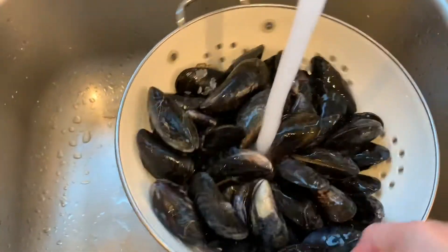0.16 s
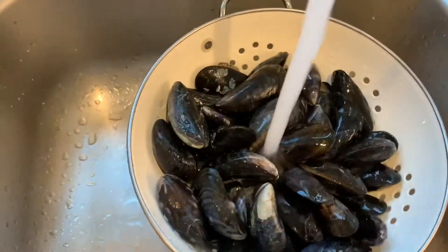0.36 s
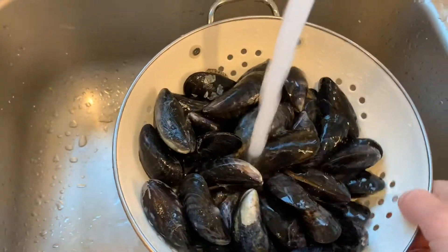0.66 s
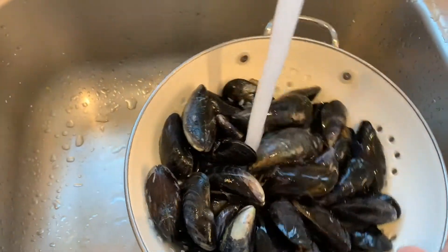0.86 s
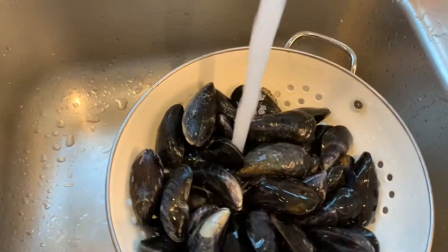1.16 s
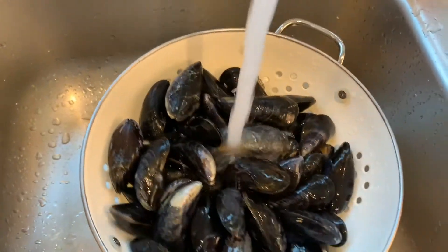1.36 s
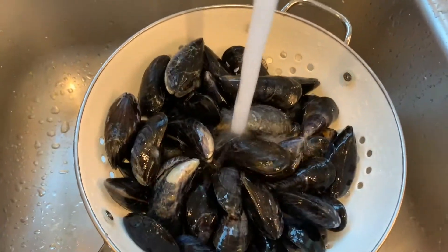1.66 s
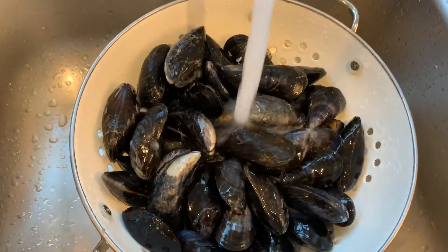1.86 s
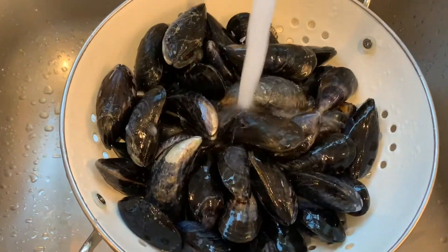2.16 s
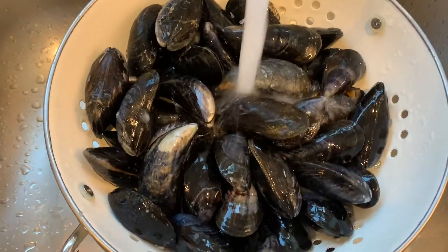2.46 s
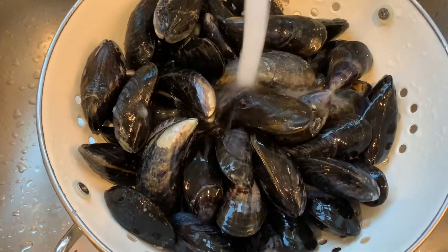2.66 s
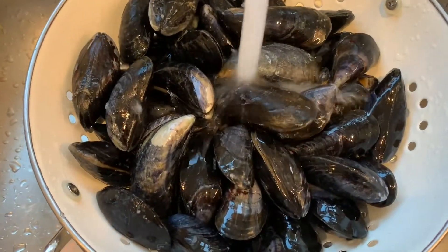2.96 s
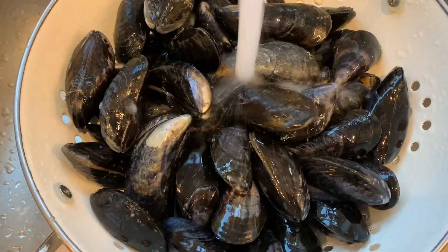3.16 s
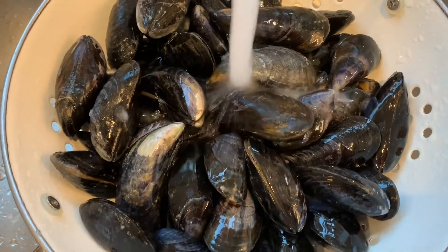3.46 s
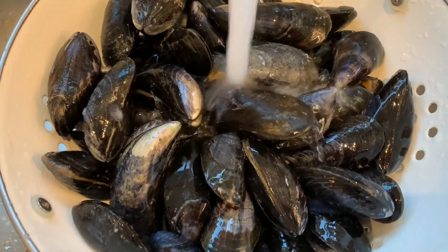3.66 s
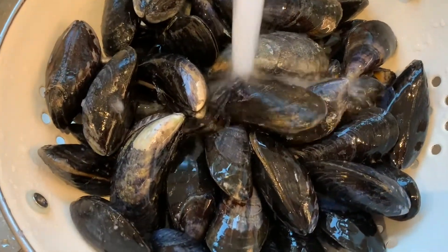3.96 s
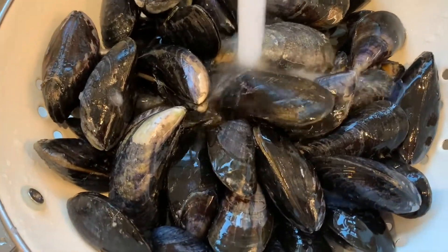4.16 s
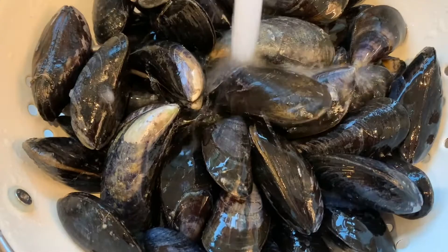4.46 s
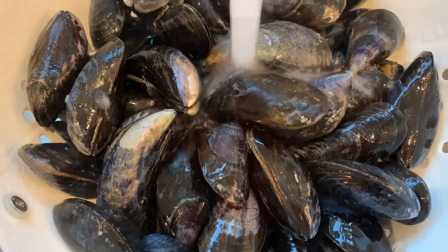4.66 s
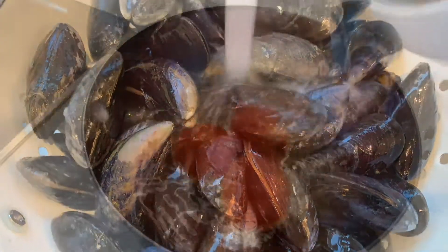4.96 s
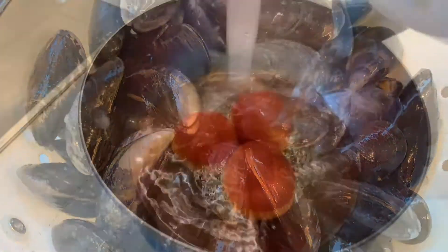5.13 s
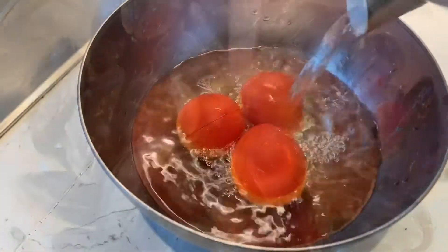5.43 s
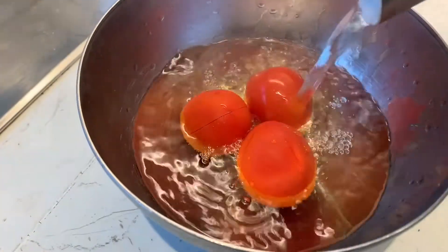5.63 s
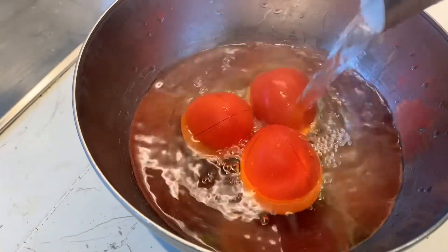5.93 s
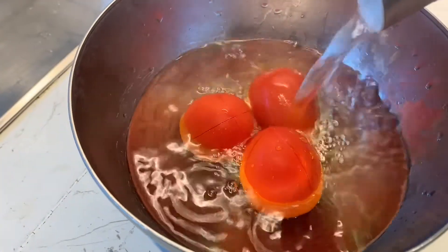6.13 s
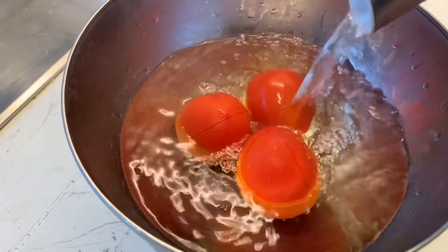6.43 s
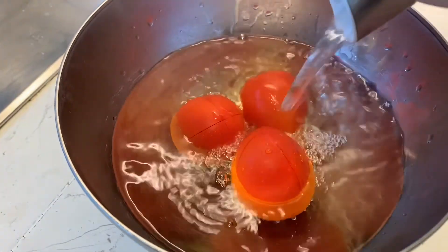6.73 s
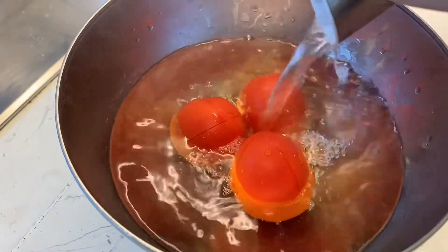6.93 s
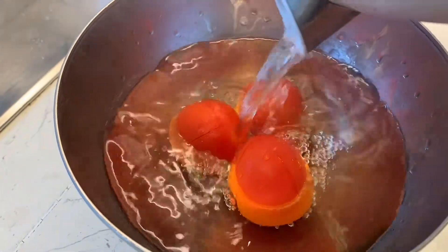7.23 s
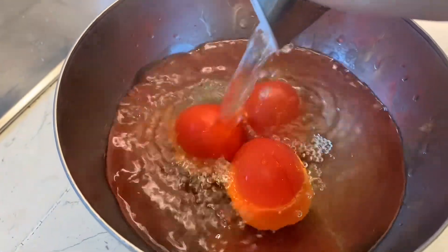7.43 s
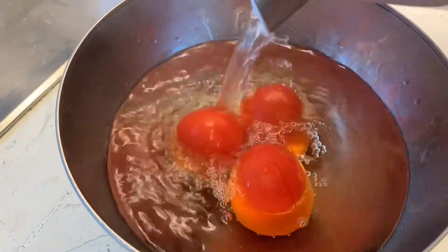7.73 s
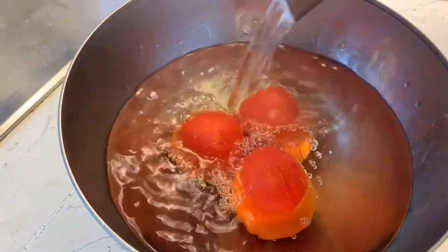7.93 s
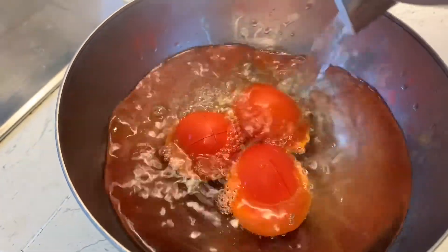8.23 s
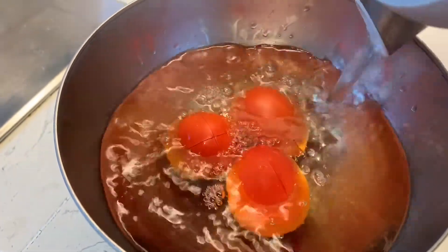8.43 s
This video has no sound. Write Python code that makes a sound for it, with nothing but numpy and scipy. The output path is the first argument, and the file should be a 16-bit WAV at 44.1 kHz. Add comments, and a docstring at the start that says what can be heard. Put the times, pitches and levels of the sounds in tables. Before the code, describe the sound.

A kitchen tap runs hard onto shellfish from the start, heard close: a bright, hissing spray with water trickling through a colander and a soft drumming on the steel sink. In the first 0.3 seconds the colander scrapes and knocks several times, making the basin boom; lighter bumps follow from 0.7 to 1.3 seconds. The spray dips briefly around 1 second, then gradually grows louder. Between 4.5 and 5.5 seconds it fades into a quieter, uneven stream poured from a jug over fruit in a steel bowl. This water fizzes and gurgles, with many small, hollow plops and crisp drops spattering over a low hum that swells with the bigger plops. The splashing is strongest around 7.5 seconds, a cluster of plops follows near 8 seconds, and the pouring continues until the end at about 8.6 seconds. A faint room rumble lies underneath throughout.

```python
"""Rinsing shellfish, pouring over fruit

A kitchen tap runs hard onto shellfish in a colander that a hand drags and bumps over a steel sink:
the jet breaks into broadband spray, and impacts and friction excite the basin's modes. The tap fades
into a jug of water poured unevenly over fruit in a steel bowl, where trapped air plops and drops
spatter over a low hum. A phone's two microphone ports hear the treble one after the other."""
import sys
import numpy as np
from scipy import signal
from scipy.fft import rfft, irfft, next_fast_len
from scipy.io import wavfile
from scipy.ndimage import uniform_filter1d, map_coordinates

SR = 44100
rng = np.random.default_rng(int(sys.argv[2]) if len(sys.argv) > 2 else 0)


def wrap_up_sound(samples):
    """Save the sound to the file named by the first command line argument, as 16-bit audio."""
    columns = np.atleast_2d(samples).T
    # keep every value between -1 and 1, then stretch to whole-number steps
    tamed = np.clip(columns, -1, 1)
    steps = np.round(tamed * 32767).astype(np.int16)
    wavfile.write(sys.argv[1], SR, steps)


N = 378819

# strength of the tap's three sounds: time_s, spray_db, runoff_db, drum_db
TAP_LEVELS = [(0, -27.5, -39, -39), (.6, -25.5, -35.5, -44.5), (.75, -31.5, -35, -41),
              (1.1, -31.5, -33.5, -44.5), (1.2, -25.5, -35.5, -42.5), (1.8, -25.5, -35, -43),
              (2.1, -23.5, -34, -42.5), (2.85, -22.5, -33.5, -41.5), (3.3, -22.5, -34.5, -41.5),
              (3.75, -22, -35.5, -41.5), (4.55, -21, -35.5, -41.5)]
# spectrum of the jet breaking on the shells: frequency_hz, gain_db
SPRAY_SPECTRUM = [(1500, -25.5), (2800, -24), (3250, -11), (3440, -24), (3750, -2), (4080, 1), (4400, -3.5),
                  (4800, 1), (5300, 0), (6300, -2.5), (7400, 1), (8300, 1.5), (10500, 0), (12600, -1),
                  (14000, 1), (15700, -3)]
# spectrum of water draining through the holes: frequency_hz, gain_db
RUNOFF_SPECTRUM = [(300, -8), (500, -24), (640, -11.5), (800, -5.5), (1050, -4.5), (1500, -3), (2100, -2.5),
                   (3000, 2.5), (4500, -0.5), (8000, -11.5)]
# modes of the steel basin: pitch_hz, bandwidth_hz, gain_db
BASIN_MODES = [(126.5, 15, -13.5), (217.6, 6.4, 1.5), (309.5, 17.5, -7.5), (432, 30, -17.5),
               (575, 54, -25.5), (895, 49, -63)]
# hollows among the shells: pitch_hz, bandwidth_hz, gain_db, growth_db_per_s
SHELL_HOLLOWS = [(780, 68, -7.5, 3), (931, 90, -10, 2), (1057, 43, 1.5, -0.7), (1250, 99, -4, 0.2),
                 (1810, 410, -3.5, -0.3), (2169, 59, 4, 0.5), (3100, 74, -3, 0.5), (3280, 200, 0.5, -0.4),
                 (4060, 260, 6.5, -0.3)]
# the colander sliding over the steel: time_s, rasp_db, boom_db
DRAG_LEVELS = [(0.0, -27, -52), (0.026, -24.5, -47), (0.054, -26.5, -43), (0.064, -33, -34),
               (0.116, -28.5, -24), (0.182, -40, -45), (0.225, -33, -30.5), (0.29, -43.5, -36.5),
               (0.37, -53, -56), (0.6, -54, -66), (0.74, -44, -60), (0.88, -57, -49), (1.0, -65, -44),
               (1.1, -58, -55), (1.27, -41.5, -60), (1.4, -77, -80)]
# modes of the colander: pitch_hz, bandwidth_hz, gain_db
COLANDER_MODES = [(437, 76, 0), (970, 95, -6.5), (1300, 530, -6), (1830, 3700, -11.5)]
# the colander's foot knocking the basin: start_s, push_db
KNOCKS = [(0.045, -16), (0.069, -7), (0.101, -6), (0.144, -8), (0.216, -7.5), (0.258, -13.5), (0.292, -25),
          (0.69, -17.5), (0.729, -12), (0.796, -20), (0.979, -19), (1.121, -22), (1.257, -24)]
# spectrum of the kitchen's rumble: frequency_hz, gain_db
RUMBLE_SPECTRUM = [(25, -42), (38, -5), (60, -1.5), (95, 0), (200, -26), (320, -5.5), (700, -24.5),
                   (1000, -20), (2000, -73)]
# strength of the pour's three sounds: time_s, fizz_db, splash_db, gurgle_db
POUR_LEVELS = [(5.55, -48, -55.5, -56.5), (5.81, -54.5, -60, -59.5), (6.02, -51.5, -64, -63.5),
               (6.19, -46.5, -58, -56), (6.46, -48, -60, -54.5), (6.74, -52.5, -57.5, -59),
               (7.04, -50.5, -67, -62), (7.24, -50, -57, -58.5), (7.4, -41.5, -55, -51.5),
               (7.48, -41, -48, -51), (7.64, -49, -59.5, -57.5), (7.92, -50.5, -67, -58),
               (8.13, -52.5, -74, -55.5), (8.29, -54.5, -68, -53.5), (8.42, -47.5, -57, -60.5),
               (8.59, -51, -59, -49.5)]
# spectrum of the poured stream's fizz: frequency_hz, gain_db
FIZZ_SPECTRUM = [(1500, -4), (2500, -3.5), (4000, 1.5), (6000, 6), (8500, 2), (10500, 2.5), (12500, 4),
                 (15500, 3.5)]
# modes of the air over the water in the bowl: pitch_hz, bandwidth_hz, gain_db
BOWL_MODES = [(570, 32, -2.5), (1110, 38, 4), (1540, 123, 2.5), (2524, 220, -10), (3110, 124, -5),
              (3770, 125, -10)]
# resonances of the low hum: pitch_hz, bandwidth_hz, gain_db
HUM_MODES = [(45, 3.6, -3), (90.2, 10, 6.5), (129, 28, -1), (153.6, 53.5, -5.5)]
# the biggest air pockets that the stream traps: start_s, level_db, pitch_hz
AIR_POCKETS = [(5.164, -37, 1180), (5.182, -33, 1570), (5.202, -39, 1100), (5.22, -36, 1530),
               (5.248, -30.5, 1580), (5.461, -41, 1520), (5.526, -35, 1140), (5.616, -33.5, 1150),
               (5.638, -32.5, 1540), (5.682, -39, 1530), (5.756, -35, 980), (5.777, -34.5, 1110),
               (5.872, -34, 1180), (5.985, -40, 1540), (6.002, -33, 1390), (6.015, -34, 1300),
               (6.043, -35, 1150), (6.075, -40, 1530), (6.132, -40, 1130), (6.163, -34.5, 1210),
               (6.184, -43, 1340), (6.198, -35, 1570), (6.204, -35, 1510), (6.22, -42, 1430),
               (6.251, -32.5, 1340), (6.279, -27, 1260), (6.294, -37, 1480), (6.303, -32, 1250),
               (6.306, -38, 1080), (6.324, -40, 900), (6.342, -36, 900), (6.381, -34.5, 1460),
               (6.45, -47, 1220), (6.468, -40, 1220), (6.512, -51, 1510), (6.528, -32, 1180),
               (6.542, -41, 1500), (6.564, -33, 1480), (6.584, -34, 1200), (6.656, -32, 1250),
               (6.891, -41, 1240), (6.999, -30, 1180), (7.02, -37, 1550), (7.053, -41, 1160),
               (7.096, -40, 1100), (7.149, -40, 1100), (7.199, -33.5, 1410), (7.231, -40, 1140),
               (7.259, -36, 1170), (7.3, -43, 1580), (7.314, -33, 1120), (7.329, -32, 1930),
               (7.347, -34, 1050), (7.367, -34, 1080), (7.379, -37, 1100), (7.398, -40, 934),
               (7.414, -43, 1760), (7.417, -23, 1780), (7.4188, -38, 1750), (7.457, -38, 1810),
               (7.505, -36, 1670), (7.52, -30, 1200), (7.548, -34, 1220), (7.561, -34, 1100),
               (7.576, -30.5, 1540), (7.629, -41, 1100), (7.659, -39, 1190), (7.671, -29.5, 1390),
               (7.806, -44, 1400), (7.843, -32, 1190), (7.926, -50, 1140), (7.938, -31.5, 1300),
               (7.939, -36, 579), (7.982, -30.5, 1420), (8.02, -25, 1250), (8.022, -34.5, 570),
               (8.041, -28.5, 1250), (8.073, -30, 1440), (8.08, -25, 1370), (8.107, -38, 1150),
               (8.178, -37, 1340), (8.195, -34, 1550), (8.215, -28, 1210), (8.243, -28, 1300),
               (8.26, -39, 1500), (8.285, -41, 1480), (8.296, -34, 1560), (8.359, -39, 1170),
               (8.371, -35, 1580), (8.404, -53, 1350), (8.423, -32.5, 1500), (8.471, -45, 1520),
               (8.493, -29, 1530), (8.505, -32, 1130), (8.527, -39, 853), (8.542, -36, 1350),
               (8.556, -37, 1520), (8.576, -35, 1110)]
# the biggest drops that burst on the fruit: start_s, snap_db, ring_db
BIG_DROPS = [(5.533, -21, -49), (5.617, -24, -48), (5.669, -35, -35), (5.728, -16.5, -43),
             (5.737, -30, -34), (5.745, -22, -46), (5.782, -23, -40), (5.9025, -26, -51),
             (5.9575, -35, -42), (5.972, -31, -52), (5.9868, -16.5, -29), (6.005, -28, -38),
             (6.01, -22, -39), (6.017, -28, -38), (6.043, -34, -50), (6.056, -35, -52), (6.076, -32, -50),
             (6.091, -31, -53), (6.104, -20, -52), (6.1254, -28, -52), (6.134, -14, -40), (6.159, -20, -46),
             (6.162, -18, -37), (6.184, -29, -50), (6.198, -29, -48), (6.2033, -24, -47),
             (6.2206, -17, -51), (6.248, -18.5, -35), (6.324, -24, -44), (6.3595, -19, -52),
             (6.371, -24, -52), (6.4674, -16, -32), (6.4784, -21, -36), (6.5123, -29, -40),
             (6.542, -24, -35), (6.5832, -16, -48), (6.6006, -22, -47), (6.626, -34, -36),
             (6.644, -17, -32.5), (6.6712, -23, -52), (6.775, -23, -46), (6.94, -24, -39),
             (7.032, -16, -46), (7.1202, -28, -58), (7.149, -19, -53), (7.155, -25, -56), (7.232, -18, -35),
             (7.24, -19, -33), (7.273, -24, -52), (7.282, -34, -44), (7.305, -24, -45), (7.3197, -25, -33),
             (7.332, -18.5, -29), (7.347, -26, -28), (7.365, -35, -38), (7.379, -33, -40),
             (7.3931, -27, -46), (7.41, -26, -46), (7.417, -26, -46), (7.431, -28, -46), (7.456, -28, -35),
             (7.4674, -21, -22.5), (7.5, -25, -36), (7.5083, -18, -42), (7.511, -26, -36),
             (7.527, -18, -30), (7.5382, -10.5, -36), (7.5484, -30, -34), (7.56, -33, -40),
             (7.5772, -29, -48), (7.628, -30, -46), (7.641, -20, -47), (7.6694, -15, -34),
             (7.719, -24, -58), (7.7428, -37, -55), (7.7797, -24, -56), (7.809, -23, -45),
             (7.8497, -23, -43), (7.876, -22, -56), (7.8989, -27, -59), (7.9258, -33, -56),
             (7.9286, -24, -56), (7.931, -8.5, -51), (7.9386, -25, -40), (7.949, -11, -41),
             (7.96, -24, -48), (7.964, -22, -51), (7.974, -22, -42), (7.9822, -13, -51), (7.9845, -24, -50),
             (7.989, -23, -52), (7.997, -17, -54), (8.0127, -22, -42), (8.021, -17, -46), (8.071, -38, -42),
             (8.079, -18, -38), (8.146, -35, -60), (8.195, -38, -57), (8.2166, -27, -57), (8.244, -23, -53),
             (8.247, -22.5, -55), (8.2528, -26, -49), (8.256, -29, -55), (8.285, -30, -51),
             (8.295, -26, -40), (8.3325, -25, -54), (8.35, -28, -50), (8.355, -22, -41), (8.359, -20, -50),
             (8.372, -26, -31), (8.406, -30, -38), (8.409, -18, -50), (8.423, -32, -43), (8.4337, -34, -53),
             (8.4447, -21, -39), (8.4542, -23, -46), (8.4706, -28, -37), (8.486, -23, -53),
             (8.49, -27, -27), (8.498, -21.5, -48), (8.528, -24, -52)]
# likeness of the sound at the two ports: frequency_hz, coherence
PORT_COHERENCE = [(140, .9995), (250, .99), (400, .92), (650, .88), (1300, .93), (2700, .7), (3600, .78),
                  (4300, .9997), (16000, .9997)]
# level of the left port over the right: frequency_hz, difference_db
PORT_BALANCE = [(300, 0), (800, -3), (2200, -2.5), (3500, 0)]
# phase by which the left side leads the right, lingering near half a turn around each treble null:
# frequency_hz, lead_rad
PORT_PHASE = [(0, 0), (700, -.4), (1300, 0), (2700, 1.8), (3300, 1.5), (4050, 2), (4400, 3), (5100, 3.3),
              (5500, 4.4), (8200, 8.3), (8500, 9.25), (9400, 9.6), (9700, 10.6), (12400, 14.5),
              (12700, 15.5), (13600, 15.9), (13900, 16.8), (17430, 22)]

SINK_FADE_OUT_S, BOWL_FADE_IN_S = (4.46, 5.545), (4.6, 5.23)  # each: start_s, end_s
TIME_S = np.arange(N) / SR


def amp(db):
    """Amplitude ratio of a level in decibels."""
    return 10 ** (np.asarray(db) / 20)


def unit(x):
    """Normalisation to an rms of 1."""
    return x / np.sqrt(np.mean(x ** 2) + 1e-20)


def along(points, hz):
    """Interpolation of (frequency_hz, value) points on a logarithmic frequency axis."""
    knots_hz, values = np.transpose(points)
    return np.interp(np.log(hz + 1), np.log(knots_hz + 1), values)


def curves(rows):
    """Linear envelopes, one for each column after the time, held beyond the ends."""
    times_s, *columns = np.transpose(rows)
    return [np.interp(TIME_S, times_s, column) for column in columns]


def ramp(span_s):
    """Linear fade from 0 to 1 over the span."""
    return np.interp(TIME_S, span_s, (0, 1))


def wobble(rate_hz):
    """Slow random modulation: a spline through rate_hz Gaussian knots a second."""
    return map_coordinates(rng.standard_normal(int(N * rate_hz / SR) + 4), [TIME_S * rate_hz])


def filtered(x, response):
    """Linear filtering: the spectrum of x times a complex frequency response."""
    size = next_fast_len(N + SR // 2)
    return irfft(rfft(x, size) * response(np.fft.rfftfreq(size, 1 / SR)), size)[..., :N]


def spectrum(table):
    """Zero-phase response through (frequency_hz, gain_db) points."""
    return lambda hz: amp(along(table, hz))


def modes(table):
    """Modal superposition: the response of damped resonators summed with alternating sign."""
    return lambda hz: sum((-1) ** k * amp(db) * 1j * hz * width / (pitch**2 - hz**2 + 1j * hz * width)
                          for k, (pitch, width, db) in enumerate(table))


def rush(response, patchy_db):
    """Coloured noise of rms 1, modulated in random patches of time and frequency."""
    cells = signal.stft(rng.standard_normal(N), nperseg=256)[2]
    patches = uniform_filter1d(rng.standard_normal(cells.shape), size=5, axis=0)
    patches = uniform_filter1d(patches, size=8, axis=1)
    noise = signal.istft(cells * amp(patchy_db * unit(patches)), nperseg=256)[1][:N]
    return unit(filtered(noise, response))


def superpose(start_s, waves):
    """Superposition of short waves, one a row, each at its own start time."""
    at = (start_s * SR).astype(int)[:, None] + np.arange(waves.shape[1])
    return np.bincount(at.ravel(), waves.ravel(), N)[:N]


def damped(start_s, db, hz, decay_cycles, rise, samples):
    """Damped oscillations that start softly and climb in pitch as they die."""
    cycles = np.arange(samples) / SR * hz[:, None]
    envelope = amp(db)[:, None] * np.exp(-cycles / decay_cycles) * (1 - np.exp(-cycles / 0.2))
    phase = 2 * np.pi * cycles * (1 + rise * cycles / decay_cycles)
    return superpose(start_s, envelope * np.sin(phase))


def grains(count, centre_hz, spread, decay_cycles, spiky_db, samples):
    """Shot noise of rms 1: droplets of log-normal pitch, a few much louder than the rest."""
    when, rank = rng.random((count, 2)).T
    hz = np.clip(centre_hz * np.exp(spread * rng.standard_normal(count)), 200, 16000)
    db = -spiky_db * np.log(rank + 1 / 200)
    return unit(damped(when * N / SR, db, hz, decay_cycles, rise=.05, samples=samples))


def sprinkle(count, flow_db, spread_db=3):
    """A random point process whose rate follows the flow: sample indices, size_db, a 0-1 draw each."""
    when, rank, draw = rng.random((count, 3)).T
    poured = np.cumsum(amp(flow_db) * ramp(BOWL_FADE_IN_S))
    return np.searchsorted(poured, when * poured[-1]), -spread_db * np.log(rank + .1), draw


def tap():
    """Impact noise: the aerated jet breaks on the shells, drains away and drums on the basin."""
    spray_db, runoff_db, drum_db = curves(TAP_LEVELS)
    spray_colour, runoff_colour = spectrum(SPRAY_SPECTRUM), spectrum(RUNOFF_SPECTRUM)
    shiver = wobble(rate_hz=45)
    droplets = grains(20000, centre_hz=13000, spread=0.25, decay_cycles=1.2, spiky_db=3.9, samples=64)
    spray = unit(rush(spray_colour, patchy_db=1.4) + 0.5 * unit(filtered(droplets, spray_colour)))
    trickle = grains(3000, centre_hz=2100, spread=0.5, decay_cycles=9, spiky_db=2, samples=600)
    trickle = unit(filtered(trickle, runoff_colour))
    hollows = shell_hollows()
    runoff = unit(rush(runoff_colour, patchy_db=1.5) + 0.28 * trickle + 0.8 * hollows)
    ring = rush(modes(BASIN_MODES), patchy_db=1.9)
    # the jet's steady push holds the basin's ring even over 0.35 s
    ring_power = np.abs(uniform_filter1d(ring ** 2, size=round(.35 * SR)))
    drum = amp(drum_db) * ring / np.sqrt(ring_power + 1e-9)
    return amp(spray_db + 0.89 * shiver) * spray + amp(runoff_db + 1.2 * shiver) * runoff + drum


def shell_hollows(swing_db=4, pivot_s=3):
    """Cavity resonance: water hisses in hollows among the shells, each filling and draining alone."""
    hiss = rush(np.ones_like, patchy_db=3)
    hollows = np.zeros(N)
    for k, (hz, width, db, growth) in enumerate(SHELL_HOLLOWS):
        swell = amp(growth * (TIME_S - pivot_s) + swing_db * wobble(rate_hz=7))
        hollows += (-1) ** k * swell * filtered(hiss, modes([(hz, width, db)]))
    return unit(hollows)


def colander():
    """Forced vibration: friction makes the colander rasp and the basin boom; knocks ring and thud."""
    # the weight resting on the steel shortens the ring
    loaded_basin = modes([(hz, width + 11, db + 5) for hz, width, db in BASIN_MODES])
    rasp_db, boom_db = curves(DRAG_LEVELS)
    rasp = amp(rasp_db) * rush(modes(COLANDER_MODES), patchy_db=3)
    boom = amp(boom_db) * rush(loaded_basin, patchy_db=2)
    force, t = np.zeros(N), np.arange(SR // 50) / SR
    soft_push = t / 0.0012 * np.exp(1 - t / 0.00095)
    for start_s, push_db in KNOCKS:
        force[round(start_s * SR):][:len(t)] -= amp(push_db) * soft_push
    thud = modes([(80, 90, -14)])
    return rasp + boom + filtered(force, lambda hz: loaded_basin(hz) + thud(hz))


def kitchen_rumble(level_db=-58):
    """Ambient noise: a steady floor with most of its energy at low frequencies."""
    return amp(level_db) * rush(spectrum(RUMBLE_SPECTRUM), patchy_db=1)


def pour():
    """Source and filter: the loose stream fizzes, and splashes and gurgles in the bowl's air modes."""
    fizz_db, splash_db, gurgle_db = curves(POUR_LEVELS)
    colour, low_modes, high_modes = spectrum(FIZZ_SPECTRUM), modes(BOWL_MODES[:3]), modes(BOWL_MODES[3:])
    lumps = amp(3.2 * wobble(rate_hz=45))  # the stream arrives unevenly
    crackle = grains(3500, centre_hz=7000, spread=0.7, decay_cycles=1, spiky_db=3.5, samples=128)
    fizz = unit(rush(colour, patchy_db=4) + unit(filtered(crackle, colour)))
    splash = unit(rush(high_modes, patchy_db=5) + 0.9 * unit(filtered(crackle, high_modes)))
    bubbles = grains(2200, centre_hz=1250, spread=0.67, decay_cycles=0.83, spiky_db=2.5, samples=500)
    bubbling = unit(filtered(bubbles + .8 * crackle, low_modes))
    gurgle = unit(rush(low_modes, patchy_db=3) + 1.6 * bubbling)
    return lumps * (amp(fizz_db) * fizz + amp(splash_db) * splash + amp(gurgle_db) * gurgle)


def hum(steady_db=-51, swell_db=-29.5, swell_s=0.02):
    """Driven resonance: the stream keeps a low hum going, which swells under each big plop."""
    swells = sum(amp(db + swell_db) * np.exp(-((TIME_S - start_s) / swell_s) ** 2)
                 for start_s, db, _ in AIR_POCKETS)
    return (amp(steady_db) + swells) * rush(modes(HUM_MODES), patchy_db=-2.5)


def plops(onset_s=.0001, slap_db=8, ring_db=-3.5, echo_s=.0053, echo_db=-10):
    """Bubble resonance: each air pocket slaps, then sings a few cycles; the bowl's air rings on."""
    gurgle_db = curves(POUR_LEVELS)[2]
    at, size_db, draw = sprinkle(count=260, flow_db=gurgle_db)
    small_pockets = np.transpose([at / SR, gurgle_db[at] + 6 + size_db, 900 + 800 * draw])
    start_s, db, pitch_hz = np.concatenate([small_pockets, AIR_POCKETS]).T
    start_s = start_s + onset_s
    cycles = np.arange(SR // 80) / SR * pitch_hz[:, None]
    peak_cycles = rng.uniform(.8, 1.5, (len(db), 1))
    pitch_sag = rng.uniform(-.01, .05, (len(db), 1))
    envelope = amp(db)[:, None] * (cycles / peak_cycles * np.exp(1 - cycles / peak_cycles)) ** 3
    notes = superpose(start_s, envelope * np.sin(2 * np.pi * cycles * (1 - pitch_sag * cycles)))
    slap_hz = np.full(len(db), 2500)
    slaps = damped(start_s, db + slap_db, slap_hz, decay_cycles=0.083, rise=0.011, samples=100)
    far_wall_echo = filtered(notes, lambda hz: amp(echo_db) * np.exp(-2j * np.pi * hz * echo_s))
    return notes + far_wall_echo + filtered(amp(ring_db) * notes + slaps, modes(BOWL_MODES))


def spatters(onset_s=0.001132, echo_s=.0015, echo_db=-11, cutoff_hz=4500):
    """Impact transients: each drop bursts with a snap inside a short sizzle and rings the bowl's air."""
    snaps, impulses, lead = np.zeros(N + SR), np.zeros(N + SR), SR // 200
    t = (np.arange(SR // 50) - lead) / SR  # time from the snap
    sizzle = 0.12 * np.exp(-np.abs(t) / np.where(t < 0, .0002, .0018))
    fizz_db, splash_db, _ = curves(POUR_LEVELS)
    at, size_db, draw = sprinkle(count=300, flow_db=fizz_db)
    small_drops = zip(at / SR, fizz_db[at] + 14 + size_db, splash_db[at] + 6 + 4 * draw)
    for start_s, snap_db, ring_db in [*small_drops, *BIG_DROPS]:
        pitch_hz = rng.uniform(6500, 12500)
        snap = np.exp(-np.abs(t) / .00005) * np.cos(2 * np.pi * pitch_hz * t + rng.uniform(-1, 1))
        hit = round((start_s + onset_s) * SR)
        snaps[hit - lead:][:len(t)] += amp(snap_db) * (snap + sizzle * rng.standard_normal(len(t)))
        impulses[hit] += amp(ring_db)
    snaps += amp(echo_db) * np.roll(snaps, round(echo_s * SR))  # reflection from the near wall
    highpass = lambda hz: hz ** 4 / (cutoff_hz ** 4 + hz ** 4)
    treble = filtered(snaps[:N], lambda hz: spectrum(FIZZ_SPECTRUM)(hz) * highpass(hz))
    ring = filtered(np.arange(N) == 0, modes(BOWL_MODES[3:]))[:SR // 10]
    return treble + signal.fftconvolve(impulses, ring / np.abs(ring).max())[:N]


def scattered(x):
    """Decorrelation: two slightly late copies with the colour and level of x but random phases."""
    cells = signal.stft(x, nperseg=64)[2]
    phases = np.exp(2j * np.pi * rng.random((2, *cells.shape)))
    copies = signal.istft(cells * phases, nperseg=64)[1][:, :N]
    return np.roll(unit(copies), 32, axis=1) * np.std(x)


def ports(x, coherence, diffuse_share):
    """Partial coherence: two ports share most sound, one lagging; moving water scatters the rest."""
    scatter, diffuse_field = scattered(x)
    angle = lambda hz: np.arccos(along(coherence, hz)) / 2
    shared = filtered(x, lambda hz: np.cos(angle(hz)))
    unshared = filtered(scatter, lambda hz: np.sin(angle(hz)))
    lead_rad = lambda hz: np.interp(hz, *np.transpose(PORT_PHASE))
    to_left = lambda hz: amp(along(PORT_BALANCE, hz) / 2) * np.exp(.5j * lead_rad(hz))
    left = filtered(shared + unshared, to_left)
    right = filtered(shared - unshared, lambda hz: 1 / to_left(hz))
    # in the treble a part of the side signal is diffuse
    diffuse = lambda hz: diffuse_share / (1 + (3800 / (hz + 1)) ** 8)
    side = filtered((left - right) / 2, lambda hz: np.sqrt(1 - diffuse(hz) ** 2))
    side += filtered(diffuse_field, lambda hz: diffuse(hz) * np.imag(to_left(hz)))
    return (left + right) / 2 + np.array([side, -side])


def scene():
    """Superposition at the two ports: the sink cross-fades into the bowl over the kitchen's rumble."""
    sink = kitchen_rumble() + (1 - ramp(SINK_FADE_OUT_S)) * (tap() + colander())
    bowl = ramp(BOWL_FADE_IN_S) * (pour() + hum() + plops() + spatters())
    # the round bowl scatters the treble more than the sink does
    bowl_coherence = [(hz, 0.9 * alike if hz > 4000 else alike) for hz, alike in PORT_COHERENCE]
    return ports(sink, PORT_COHERENCE, diffuse_share=.7) + ports(bowl, bowl_coherence, diffuse_share=.45)


def record(dry):
    """Band limiting: the phone passes nothing above its cutoff frequency."""
    cutoff_hz = 15760
    return filtered(dry, lambda hz: hz < cutoff_hz)


dry = scene()
out = record(dry)
wrap_up_sound(out)
```